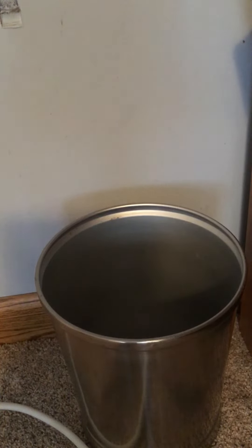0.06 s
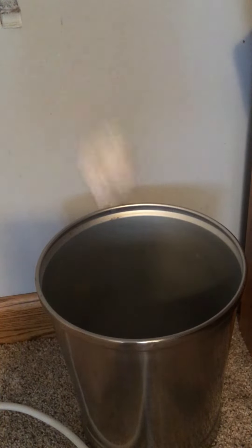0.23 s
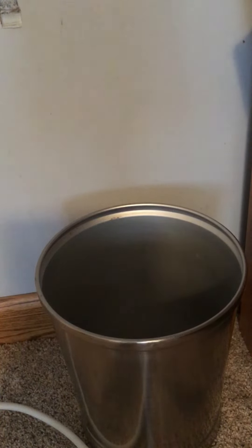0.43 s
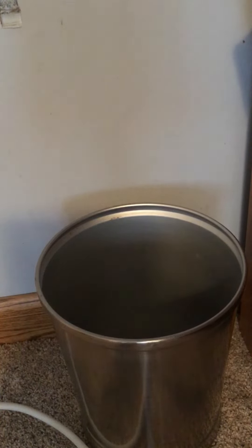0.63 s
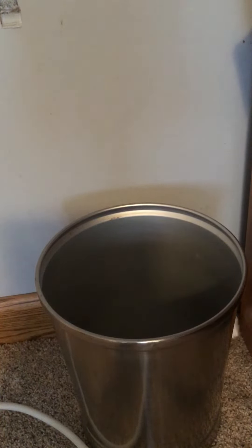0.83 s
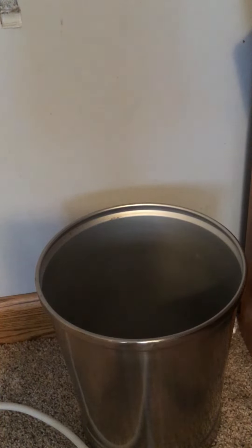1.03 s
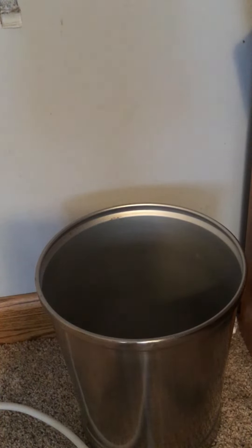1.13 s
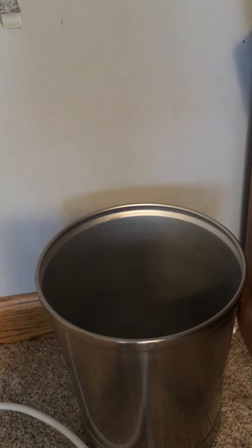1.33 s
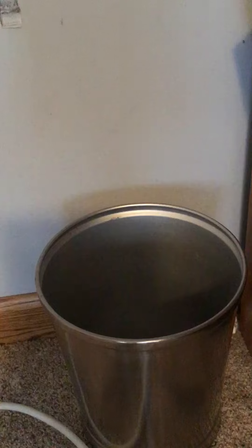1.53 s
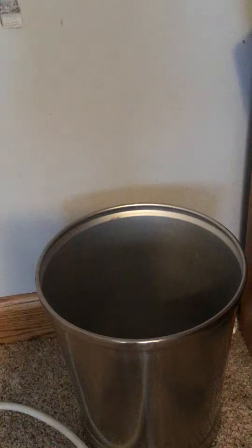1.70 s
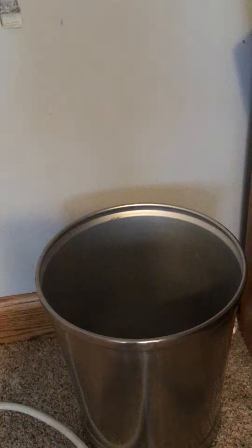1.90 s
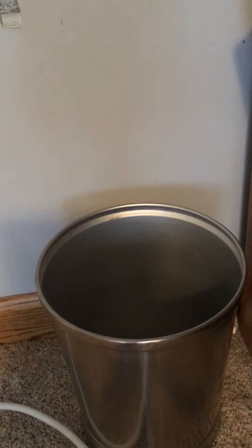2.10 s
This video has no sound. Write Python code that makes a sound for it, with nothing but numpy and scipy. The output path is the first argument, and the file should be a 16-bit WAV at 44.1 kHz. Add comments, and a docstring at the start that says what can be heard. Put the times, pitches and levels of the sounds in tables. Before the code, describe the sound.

In a small room with a low hum, a thrown paper ball crunches and thumps against a nearby wall. It glances off a metal bin's rim with a faint ring and lands lightly on carpet, followed by faint scuffs.

```python
"""A crunch and a hollow thump: a crumpled paper ball hits a wall. Its creases buckle in a burst of clicks
while the panel bends and booms. The ball drops onto the rim of a steel bin, which rings faintly, grazes
past it and lands on carpet, ticking as the paper relaxes. A few soft, close scuffs follow.
Under it all lies a small room with a low appliance hum, rumble and hiss."""
import sys
import numpy as np
from scipy import signal
from scipy.fft import rfft, irfft, next_fast_len
from scipy.io import wavfile
from scipy.ndimage import map_coordinates

SR = 44100
rng = np.random.default_rng(int(sys.argv[2]) if len(sys.argv) > 2 else 0)


def dump_mix(stems):
    """Bounce the given channels to the path in sys.argv[1] as a 16-bit WAV at rate SR."""
    frames = np.atleast_2d(stems).T  # one column per channel
    limited = np.clip(frames, -1, 1)  # hard clip at full scale
    pcm = np.round(limited * 32767).astype(np.int16)
    wavfile.write(sys.argv[1], SR, pcm)


N = 94815
T = np.arange(N) / SR
PRESS_S = 0.00047  # attack of a contact


# The ball's hits. Each row: start in seconds, level in dB, 60 dB decay in seconds,
# treble tilt in dB per octave, pitch of the buckling facet in Hz, boost at that pitch in dB.
CRUNCHES = [(0.2161, -25, 0.046, 1.46, 6950, 0.5), (.2180, -22, 0.021, 0, 3970, 1.5),
            (0.2233, -23, 0.027, 0.5, 2550, 2.5), (.2315, -36, 0.043, -2.5, 5500, 6),
            (0.252, -50, .08, 0, 8500, 7), (0.2659, -38.5, 0.033, -0.5, 4500, 2),
            (0.269, -42.5, 0.036, 3.5, 5000, -1), (0.3315, -39.5, 0.022, 1, 4540, 12.5),
            (0.3333, -32, 0.023, -1, 1950, 10), (0.3364, -40, 0.061, 0, 1415, 15.5),
            (.338, -41, 0.013, -1, 13000, 6), (0.3474, -29.5, 0.0092, -1.5, 8300, 19),
            (0.3513, -36, 0.021, -.5, 7900, 0), (0.3764, -43, 0.035, -2, 1830, 3.5),
            (.433, -55.5, 0.068, -0.5, 1570, 10), (.522, -65.5, 0.11, -1.5, 1990, 3),
            (0.676, -71, 0.024, 2, 8000, 2), (.7042, -55.5, 0.052, -0.5, 6470, 6.5),
            (.7072, -50, 0.022, 1.5, 3580, 5.5), (0.717, -65.5, 0.094, -5, 3000, 12)]
def paper_crunches(size=6000):
    """Each contact buckles a fast-fading cluster of creases, and the room answers it."""
    out = np.zeros(N + SR)
    for start, db, t60, tilt, facet_hz, boost in CRUNCHES:
        press = fade(T[:size], t60, PRESS_S)
        clicks = unit(creases(per_second=9000, size=size) * press) * np.sqrt(np.mean(press ** 2))
        burst = np.convolve(clicks, crease_snap(tilt, facet_hz, boost))
        heard = signal.fftconvolve(burst, room_response())
        out[round(start * SR):][:len(heard)] += amp(db) * heard
    return out[:N]


def creases(per_second, size, scatter=0.44):
    """Creases give way at random: impulses of either sign and uneven strength."""
    gives_way = rng.random(size) < per_second / SR
    return gives_way * np.sign(rng.standard_normal(size)) * np.exp(scatter * rng.standard_normal(size))


# The tone of snapping paper. Each row: frequency in Hz, gain in dB.
PAPER_EQ = [(100, -16), (300, 0), (700, 0), (1400, -6), (2700, -1), (4500, -3.5), (6500, -6.5),
            (9000, -8.5), (12000, -14.5), (15500, -15)]
def crease_snap(tilt, facet_hz, boost_db, size=512):
    """The click of one crease, with a resonant bump at its facet's pitch; energy 1."""
    hz = np.fft.rfftfreq(size, 1 / SR)
    octaves = np.log2(np.maximum(hz, 500) / facet_hz)
    bump_db = boost_db * bell(octaves, width=.3)
    cepstrum = irfft(np.log(amp(along(PAPER_EQ, hz) + tilt * octaves + bump_db)))
    cepstrum[1:size // 2] *= 2  # fold to minimum phase for a sharp front edge
    cepstrum[size // 2 + 1:] = 0
    click = irfft(np.exp(rfft(cepstrum)))
    return click / np.linalg.norm(click)


def paper_crinkle(start=0.41, db=-58):
    """Sparse tiny ticks as the squashed ball relaxes."""
    ticks = creases(per_second=95, size=N) * fade(since(start), t60=2.1, rise=PRESS_S)
    return amp(db) * np.convolve(ticks, crease_snap(tilt=1, facet_hz=7900, boost_db=2))[:N]


# The wall's low boom, and above it the hollow ring of the bin's air cavity. Each row: pitch in Hz, level in dB,
# 60 dB decay in seconds.
BOOM_MODES = [(88.8, -40, 0.25), (113, -33, 0.34), (148.3, -35.5, 0.27), (195.8, -41.5, 0.29),
              (251, -46.5, 0.42), (325.3, -43.5, 0.32), (385.8, -41, 0.25)]
HOLLOW_MODES = [(496.5, -44, .16), (587, -43, .16), (716, -44, .15), (850, -47, 0.081), (1104, -52, .22),
                (1388, -44.5, .16), (2155, -48, 0.17), (2603, -37, 0.11), (2644, -50, 0.24),
                (2910, -43, .17), (3900, -47, 0.14), (4230, -46, 0.18), (5123, -49, .12), (5276, -47, .14)]
def wall_thump(start=.2165, db=-24, from_hz=308, to_hz=104, glide_s=0.01502, peak_s=0.015, width_s=0.0048):
    """The thump glides down as the panel bends, and the struck modes ring on."""
    t = since(start)
    hz = to_hz + (from_hz - to_hz) * np.exp(-(t / glide_s) ** 4)
    swell = (1 - np.exp(-t / PRESS_S)) / np.cosh(np.minimum(abs(t - peak_s) / width_s, 20))
    thump = amp(db) * swell * np.sin(2 * np.pi * np.cumsum(hz * (t > 0)) / SR)
    return thump + ring(start, BOOM_MODES, rise=.012) + ring(start, HOLLOW_MODES, rise=0.00279)


# The dull body under the later hits. Each row: start in seconds, gain in dB.
KNOCKS = [(.336, -44.5), (.374, -52.5), (.433, -65), (.706, -61.5)]
# The tone of a knock. Each row: pitch in Hz, relative level in dB, 60 dB decay in seconds.
KNOCK_MODES = [(137, 2, 0.16), (211.6, -1, .12), (276.2, 0, 0.11), (450.5, -9.5, .12), (725, -3.5, 0.055)]
def ball_knocks():
    """The light ball's weight puts a low knock under four later contacts."""
    return sum(amp(db) * ring(start, KNOCK_MODES, rise=0.0015) for start, db in KNOCKS)


# The bin's shimmer. Each row: pitch in Hz, relative level in dB, 60 dB decay in seconds,
# beat rate in Hz, strength of the twin mode as a fraction.
BIN_MODES = [(1077, -16.5, 1.23, 4, 0.13), (1899, -2.5, 1.48, 5.7, .35), (2896, -10.5, 0.83, 9, 0.27),
             (3210, 2.5, 0.92, 3.18, 0.23), (3410, -20, .7, 6, .3), (4732, -20, .7, 7, 0.27),
             (5386, -13, 0.852, 3.3, 0.23), (5609, -11, 0.86, 4, 0.23), (6100, -18, 0.86, 6.35, .3),
             (6550, -15, .5, 9, .3), (7130, -14, .65, 7.6, 0.25), (8400, -15, .45, 13, .3)]
# The blows that wake it. Each row: start in seconds, gain in dB, treble tilt in dB per octave.
BIN_BLOWS = [(0.219, -55, 3.5), (0.333, -63.5, -4.5)]
def steel_bin(rim_s=.334):
    """Each blow adds energy to the shell's beating pairs of modes, opposite in phase at the rim hit."""
    out = np.zeros(N)
    for hz, mode_db, t60, beat_hz, twin in BIN_MODES:
        octaves = np.log2(hz / 3000)
        energy = sum((amp(db + mode_db + tilt * octaves) * fade(since(start), t60, PRESS_S)) ** 2
                     for start, db, tilt in BIN_BLOWS)
        phase = 2 * np.pi * (hz * T + rng.random())
        twin_phase = phase + 2 * np.pi * beat_hz * (T - rim_s)
        out += np.sqrt(energy) * (np.sin(phase) - twin * np.sin(twin_phase))
    return out


# The closing scuffs. Each row: peak time in seconds, level in dB, half-width in seconds.
SCUFFS = [(0.952, -70, 0.016), (.98, -72, 0.023), (1.14, -77, 0.025), (1.6, -79, 0.026),
          (1.7, -75.5, 0.035), (1.848, -68.5, 0.0034), (1.86, -70.5, 0.0083), (1.875, -77, 0.017),
          (1.955, -74, .015), (2.08, -81.5, 0.053)]
# Their muffled tone. Each row: frequency in Hz, gain in dB.
SCUFF_EQ = [(100, -6), (300, 3.5), (700, 3.5), (1500, -8), (4000, -9.5), (7000, -31), (15000, -33.5)]
def scuffs():
    """Soft, dull brushes that swell and fade."""
    return noise(SCUFF_EQ) * sum(amp(db) * bell(T - peak, width) for peak, db, width in SCUFFS)


# The room's short tail. Each row: frequency in Hz, 60 dB decay in seconds.
ROOM_DECAY = [(150, 0.59), (1000, .38), (4000, 0.4), (9000, 0.37), (15000, 0.38)]
def room_response(size=24000, tail_db=-15, early_db=-10):
    """Direct sound, close corner reflections and a tail; new for each place of the ball."""
    hz, t, spectrum = signal.stft(rng.standard_normal(size), SR, nperseg=256)
    decay = amp(-60 * t / along(ROOM_DECAY, hz)[:, None])
    tail = signal.istft(spectrum * decay, SR, nperseg=256)[1][:size]
    early = rng.standard_normal(size) * fade(T[:size], t60=0.0866, rise=0.0031)
    echoes = amp(tail_db) * tail / np.linalg.norm(tail) + amp(early_db) * early / np.linalg.norm(early)
    return signal.unit_impulse(size) + echoes


# The hum's fader moves. Each row: time in seconds, low tone level in dB, overtone level in dB.
HUM_LEVELS = [(0, -49.5, -59.5), (.5, -52.5, -60), (.95, -53.5, -63.5), (1.249, -58, -74.5),
              (1.449, -57, -70), (1.8, -60.5, -68.5), (2.15, -61, -71)]
def appliance_hum(low_hz=88.8, overtone_hz=161.4):
    """Two tones that grow less steady as they fade."""
    waver_db = .5 + 0.68 * T
    out = np.zeros(N)
    for hz, db in zip((low_hz, overtone_hz), curves(HUM_LEVELS)):
        rms = amp(db + waver_db * wobble(per_second=8.3))
        out += np.sqrt(2) * rms * np.sin(2 * np.pi * hz * T + .2 * wobble(per_second=6))
    return out


# Fader moves for rumble and hiss. Each row: time in seconds, level in dB.
RUMBLE_LEVEL = [(0, -63.5), (1, -65), (1.62, -63), (1.72, -53.5), (1.88, -59.5), (2.15, -64.5)]
HISS_LEVEL = [(0, -71), (1.3, -73), (2.15, -70.5)]
# Their tone. Each row: frequency in Hz, gain in dB.
RUMBLE_EQ = [(20, -32), (45, -19), (65, -4.5), (105, 0.5), (140, -7.5), (200, -17.5), (400, -41),
             (1000, -73)]
HISS_EQ = [(30, -7), (150, -2), (300, 1), (500, -9), (800, -12), (1300, -16.5), (3000, -18), (6000, -22),
           (10000, -27.5), (15500, -30.5)]
def room_tone():
    """A low rumble that swells near the end, and a faint hiss."""
    rumble = amp(curves(RUMBLE_LEVEL)[0]) * noise(RUMBLE_EQ)
    hiss = amp(curves(HISS_LEVEL)[0]) * noise(HISS_EQ)
    return rumble + hiss


def ring(start, modes, rise):
    """Damped modes struck together, each at a random phase."""
    t = since(start)
    return sum(amp(db) * fade(t, t60, rise) * np.sin(2 * np.pi * (hz * t + rng.random()))
               for hz, db, t60 in modes)


def noise(eq):
    """Noise shaped by an EQ curve, rms 1."""
    size = next_fast_len(N + SR // 2)
    gain = amp(along(eq, np.fft.rfftfreq(size, 1 / SR)))
    return unit(irfft(rfft(rng.standard_normal(N), size) * gain, size)[:N])


def fade(t, t60, rise):
    """Attack, then a release that falls 60 dB in t60 seconds."""
    return amp(-60 * t / t60) * (1 - np.exp(-t / rise))


def since(start):
    """Seconds since start, zero before it."""
    return np.maximum(T - start, 0)


def bell(x, width):
    """A Gaussian bump of height 1."""
    return np.exp(-.5 * (x / width) ** 2)


def wobble(per_second):
    """A smooth random curve."""
    return map_coordinates(rng.standard_normal(200), [T * per_second + 2], mode="mirror")


def curves(rows):
    """One value per sample for each column after the time."""
    times, *columns = np.transpose(rows)
    return [np.interp(T, times, column) for column in columns]


def along(points, hz):
    """Read (Hz, value) points on a log axis."""
    freqs, values = np.transpose(points)
    return np.interp(np.log(hz + 1), np.log(freqs + 1), values)


def amp(db):
    """Decibels to gain."""
    return 10 ** (np.asarray(db) / 20)


def unit(x):
    """Scale to rms 1."""
    return x / np.sqrt(np.mean(x ** 2) + 1e-20)


def scene():
    """Ball, wall and bin over the room's background, in mono."""
    throw = paper_crunches() + paper_crinkle() + wall_thump() + ball_knocks() + steel_bin()
    return (throw + scuffs() + appliance_hum() + room_tone())[None]


def record(dry):
    """A steep low-pass trims the very top of the treble."""
    return signal.sosfilt(signal.ellip(10, .1, 80, 15900, fs=SR, output="sos"), dry)


dry = scene()
out = record(dry)
dump_mix(out)
```